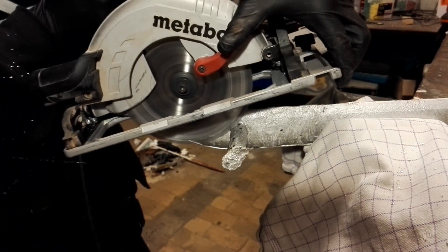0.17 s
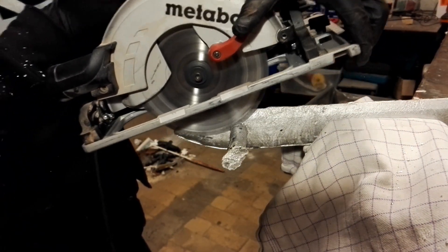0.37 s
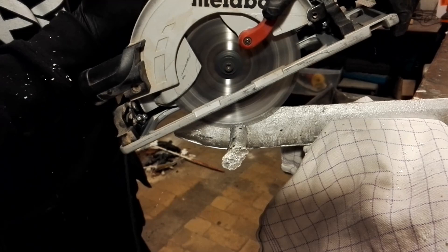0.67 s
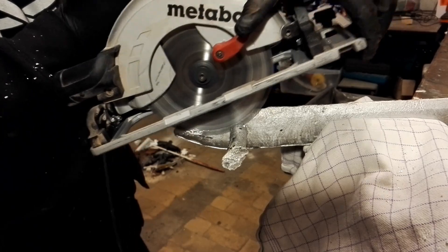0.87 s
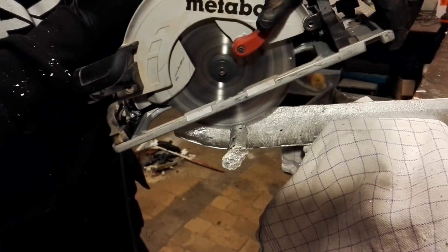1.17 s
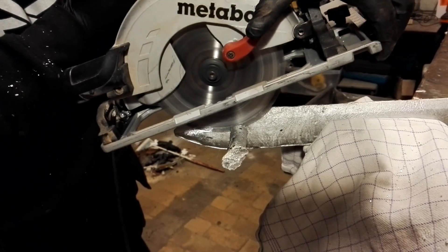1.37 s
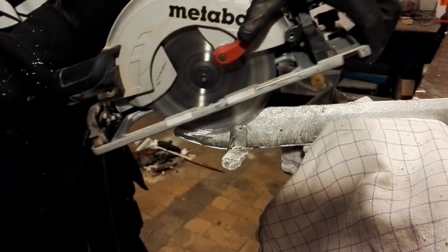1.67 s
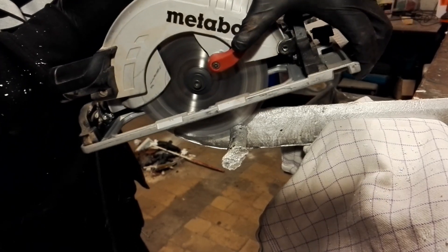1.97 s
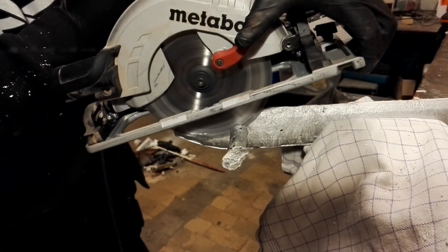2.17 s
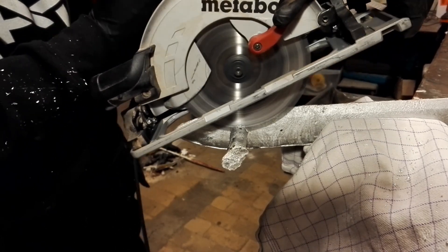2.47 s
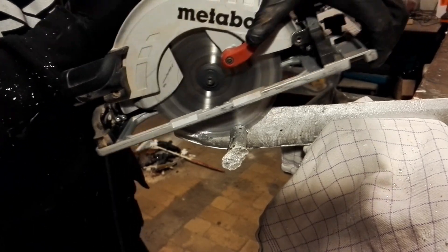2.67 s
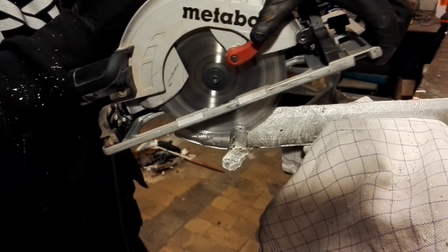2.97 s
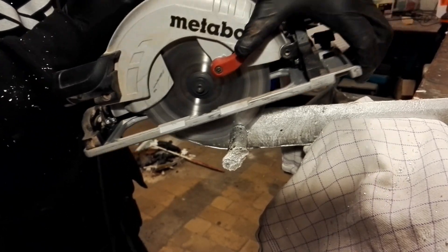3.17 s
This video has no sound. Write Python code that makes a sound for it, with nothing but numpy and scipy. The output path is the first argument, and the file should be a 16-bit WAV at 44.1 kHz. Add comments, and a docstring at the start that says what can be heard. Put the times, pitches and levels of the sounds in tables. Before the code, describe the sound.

A handheld circular saw grinds loudly through a metal bar, with one brief break.

```python
"""In a workshop, a handheld circular saw grinds through a rough metal bar, close to a stereo microphone.
The teeth tear out a dense roar, whine as they strike one after another and break off ticking chips.
The blade and the bar ring. The cut eases briefly a few times; just after one second the blade leaves
the metal and only the free-running motor is left. The microphone is overloaded, which roughens it all."""
import sys
import numpy as np
from scipy import signal
from scipy.fft import rfft, irfft, next_fast_len
from scipy.io import wavfile

SR = 44100
rng = np.random.default_rng(int(sys.argv[2]) if len(sys.argv) > 2 else 0)


def dump_mix(stems):
    """Bounce the given channels to the path in sys.argv[1] as a 16-bit WAV at rate SR."""
    frames = np.atleast_2d(stems).T  # one column per channel
    limited = np.clip(frames, -1, 1)  # hard clip at full scale
    pcm = np.round(limited * 32767).astype(np.int16)
    wavfile.write(sys.argv[1], SR, pcm)


N = 146853   # samples: 3.33 s

# How hard the teeth bite, which sets the loudness of the whole cut: t/s, level/dB
BITE = [(0, -35), (.012, -43), (.03, -44.5), (.045, -44), (.062, -33.5), (.1, -34), (.2, -32.5),
        (.3, -34.5), (.55, -34), (.8, -34.5), (.9, -34), (1.0, -31), (1.096, -34.5), (1.109, -40.5),
        (1.127, -62), (1.163, -68), (1.170, -60), (1.173, -39.5), (1.198, -67), (1.202, -35.5),
        (1.216, -38), (1.224, -36), (1.3, -36), (1.4, -31.5), (1.6, -33), (1.72, -32.5), (1.735, -36),
        (1.76, -35), (1.777, -47), (1.788, -36.5), (1.797, -34.5), (1.87, -31), (1.925, -36), (2.0, -34.5),
        (2.3, -32.5), (2.42, -34), (2.52, -36), (2.75, -33.5), (2.93, -34), (3.02, -32.5), (3.1, -33.5),
        (3.15, -34.5), (3.22, -34), (3.33, -33)]
# The roar's tone, from low to high: f/Hz, relative level/dB
ROAR_SPECTRUM = [(12, -30), (20, -8), (150, -6), (330, -3.5), (700, -3), (1100, -5), (1600, -4),
                 (2100, -5.5), (3000, -3.5), (4000, -5), (5200, -3.5), (7000, -5), (9000, -5.5),
                 (12000, -7), (16000, -7)]
# The roar's two low regions, rumble then growl: centre f/Hz, width/octaves
LOW_REGIONS = [(100, 2.1), (500, 0.54)]
# How those regions swell and sink: t/s, rumble/dB, left growl/dB, right growl/dB
LOW_SWELLS = [(0, 1, -4, -2.5), (.25, -2, 3, 1), (.52, -0.5, 3, 2), (.75, 1.5, 1.5, 0.5),
              (1.0, 1, -0.5, -3), (1.25, 1, 1.5, -1), (1.55, 0.5, -2, -3.5), (2.15, -0.5, 1.5, -0.5),
              (2.5, 1, 1, -0.5), (2.62, 1, 8, -2), (2.75, -2, 1.5, 1), (2.9, 1, -3.5, -1),
              (3.33, 1, -1, -1)]
# The teeth's whine. Its overtone is at twice the tooth rate (the number of strikes a second):
# t/s, overtone f/Hz, left overtone level/dB, right overtone level/dB, left tooth-rate level/dB
TOOTH_WHINE = [(0, 4860, -9, 2, -21), (.1, 4720, -9, -3.5, -21), (.25, 4690, -9, -3, -18),
               (.4, 4760, -14, -3.5, -24), (.51, 4800, -18, -7.5, -10), (.58, 4770, -26, -26, -16),
               (.8, 4825, -25, -14, -23), (.95, 4760, -28, -22, -18), (1.09, 4873, -20, -13, -17),
               (1.21, 4585, -12, -6.5, -15), (1.3, 4630, -16, -6.5, -11), (1.42, 4830, -23, -18, -19),
               (1.55, 4890, -15, -20, -25), (1.74, 4876, -19, -9, -21), (1.85, 4826, -18, -9.5, -16),
               (2.05, 4740, -26, -7, -13.5), (2.26, 4840, -22, -9, -19), (2.36, 4870, -27, -20, -14),
               (2.5, 4903, -25, -10, -14.5), (2.72, 4930, -22, -9, -18), (2.8, 4846, -18, -14, -24),
               (3.05, 4913, -19, -16, -17), (3.17, 4990, -19, -10, -14), (3.33, 5010, -26, -22, -22)]
# How far the overtone's left wave runs ahead of its right as the saw tilts: t/s, lead/radians
WHINE_LEFT_LEAD = [(0, 2.8), (.5, 3.1), (1.2, 1.4), (1.5, .6), (1.9, -1.6), (2.6, -2.4), (3.1, -1.5)]
# The blade's broad screech: t/s, centre f/Hz, right level/dB
BLADE_SCREECH = [(0.08, 5600, -19), (0.25, 5600, -19), (0.52, 5630, -14), (0.65, 5550, -8),
                 (0.95, 5610, -10.5), (1.22, 5555, -11), (1.32, 5480.0, -15), (1.45, 5706, -12),
                 (1.9, 5650, -14), (2.05, 5650, -13), (2.2, 5640, -14), (2.35, 5560, -10.5),
                 (2.5, 5424, -7.5), (2.62, 5450, -11), (2.75, 5590, -16), (2.9, 5620, -10),
                 (3.05, 5600, -9.5), (3.18, 5450, -7.5), (3.33, 5605, -15)]
# The bar's rasping ring: t/s, centre f/Hz, left level/dB, right level/dB
BAR_RASP = [(0.08, 1689, -12, -10.5), (0.25, 1710, -17, -17), (0.4, 1614, -11.5, -13),
            (0.52, 1650, -21, -20), (0.65, 1620.0, -11.5, -11), (0.8, 1566, -17, -11.5),
            (0.95, 1453, -18, -16), (1.08, 1370.0, -19, -28), (1.22, 1550.0, -11, -13),
            (1.32, 1800.0, -9.5, -9.5), (1.45, 1500.0, -15.5, -29), (1.6, 1375, -18, -15),
            (1.9, 1690.0, -25, -20), (2.05, 1725, -35, -15.5), (2.35, 1440, -11.5, -18),
            (2.5, 1676, -17, -12), (2.66, 1550, -19, -14), (2.76, 1470, -7.5, -14), (2.9, 1455, -16, -14),
            (3.03, 1451, -9, -21), (3.2, 1400, -12.5, -23)]
# Blade notes that each swell once:
# f/Hz, width/Hz, relative level/dB, peak t/s, time spread/s, left minus right/dB
BLADE_NOTES = [(414, 64, -25, 2.55, 0.11, 4), (2885, 550, -12, 0.3, 0.33, 8),
               (6810, 180, -10, 2.1, 0.28, 5), (8600, 270, -9, 0.762, .13, -6),
               (8580, 300, -11, 2.65, .12, -7), (10570, 650, -9.5, 0.27, 0.2, -7),
               (11760, 390, -10, 2.295, 0.2, -7), (14300, 400, -7, .2, .25, 6),
               (14250, 300, -7, 2.4, .07, -4), (14300, 350, -9, 3.1, 0.079, -5)]
# Peaks and dips that the guard around the blade puts in the treble: f/Hz, gain/dB
GUARD_PEAKS = [(6300, 0), (7200, 1), (8150, -1.5), (8700, .5), (9300, -1), (10400, .5), (11200, -2),
               (11600, 0.5), (12050, 1), (12500, -4.5), (13000, 2), (13450, -1.5), (14250, 0.5),
               (15050, -2), (15600, 1.5)]
# The tone of the rushing motor and fan: f/Hz, relative level/dB
MOTOR_SPECTRUM = [(24, -24), (40, 3), (150, -3), (400, -2), (1300, -5.5), (2200, -3), (4000, 0), (9000, -2),
                  (12000, -1.5), (16000, -6)]
# Thin whistles of the motor's brushes: f/Hz, level/dB
BRUSH_WHISTLES = [(11070, -72), (14150, -69)]
# Which side the roar and the motor's rush lean to: f/Hz, left minus right/dB
STEREO_BALANCE = [(25, -2), (110, 0.8), (250, 1), (700, 0.5), (1290, 0), (2380, 1.5), (4400, -0.5),
                  (8120, -2), (15000, -2.5)]
# How alike their two sides are: f/Hz, likeness (0 is unrelated, 1 is the same)
STEREO_LIKENESS = [(60, .05), (250, -0.091), (1000, -.03), (4000, -0.014), (8000, 0.064), (13000, 0.069)]


def roar(level_db=-0.58, flutter_db=1.16, patchy_db=.6):
    """Teeth tearing metal make a broad, flickering noise whose low notes swell and sink."""
    rumble_db, *growl_db = over_time(LOW_SWELLS)
    flutter = flutter_db * drift(16)[0]   # moves all bands and both sides together

    def band_change_db(hz):
        rumble, growl = [bell(np.log2(hz / centre), width) for centre, width in LOW_REGIONS]
        return rumble * rumble_db + growl * np.array(growl_db) + flutter + patchy_db * drift(6.8)
    return from_db(level_db) * shaped_noise(ROAR_SPECTRUM, band_change_db)


def tooth_whine(width_hz=180, third_db=-17, right_db=-7):
    """Tooth strikes make ragged tones at 1, 2 and 3 times the tooth rate, which sags under load."""
    overtone_hz, *overtone_db, tooth_db = over_time(TOOTH_WHINE)
    lead, = over_time(WHINE_LEFT_LEAD)
    tooth_hz = overtone_hz / 2
    second = ragged_tone(overtone_hz, width_hz, shared=.8, lead=lead)
    third = from_db(third_db) * ragged_tone(3 * tooth_hz, width_hz)
    first = from_db([tooth_db, tooth_db + right_db]) * ragged_tone(tooth_hz, width_hz)
    return first + from_db(overtone_db) * (second + third)


def blade_screech(left_db=-17):
    """The blade screeches, mostly on the right; the pitch wanders as it works deeper."""
    hz, db = over_time(BLADE_SCREECH)
    return from_db([db + left_db, db]) * tone_pair(hz, split_hz=220, width_hz=280)


def bar_rasp():
    """The bar rings with a rasp whose pitch wanders as the cut deepens."""
    hz, left_db, right_db = over_time(BAR_RASP)
    return from_db([left_db, right_db]) * tone_pair(hz, split_hz=150, width_hz=200)


def blade_shimmer(level_db=-10, swing_db=5, width_hz=200):
    """The blade vibrates in many small ways, each ringing up and dying away by chance."""
    pitches_hz = 2500 * 6 ** rng.random(30)   # 2500 to 15000 Hz
    rings = sum(from_db(swing_db * drift(2.9)) * ragged_tone(hz, width_hz) for hz in pitches_hz)
    return from_db(level_db) * unit_level(rings)


def blade_swells(resting_db=-18, swell_db=9, waver_db=1.5):
    """Each of the blade's own notes swells as the cut passes the depth that suits it."""
    t = np.arange(N) / SR
    notes = 0
    for hz, width_hz, db, peak_s, spread_s, balance_db in BLADE_NOTES:
        level_db = db + resting_db + swell_db * bell(t - peak_s, spread_s) + waver_db * drift(2.2)
        notes += from_db(level_db) * pan(balance_db) * ragged_tone(hz, width_hz)
    return notes


def chips(per_second=900, level_db=-20.5):
    """Chips of metal break off with tiny, sharp ticks."""
    breaks = rng.random((2, N)) < per_second / SR
    strength_db = 1.3 * np.minimum(rng.exponential(1, (2, N)), 4)
    ticks = cut_lows(breaks * from_db(strength_db), hz=600)
    return from_db(level_db) * unit_level(ticks)


def blade_guard(sound):
    """The guard around the blade lifts some high pitches and weakens others."""
    size = next_fast_len(N)
    hz = np.arange(1, size // 2 + 2) * SR / size
    return irfft(rfft(sound, size) * from_db(at_hz(GUARD_PEAKS, hz)), size)[:, :N]


def motor(rush_db=-49.5):
    """The motor and its fan rush steadily while the brushes whistle faintly."""
    rush = from_db(rush_db) * shaped_noise(MOTOR_SPECTRUM, lambda hz: 0)
    return rush + sum(from_db(db) * ragged_tone(hz, width_hz=40) for hz, db in BRUSH_WHISTLES)


def shaped_noise(spectrum, band_change_db):
    """Stereo noise built from bands a third of an octave wide, each with its own level."""
    edges_hz = 20 * 2 ** np.arange(0, 10, 1 / 3)
    white = rng.standard_normal((2, 2, N + 4000))   # extra samples let the filters settle
    noise = 0
    for k, (low, high) in enumerate(zip(edges_hz, edges_hz[1:])):
        band_filter = signal.butter(2, [low, high], "band", fs=SR, output="sos")
        band = signal.sosfilt(band_filter, white[k % 2])[:, -N:]
        hz = np.sqrt(low * high)
        band = band + at_hz(STEREO_LIKENESS, hz) / 2 * band[::-1]   # mix in a little of the other side
        gain = from_db(at_hz(spectrum, hz) + band_change_db(hz))
        noise += gain * pan(at_hz(STEREO_BALANCE, hz)) * band
    return unit_level(noise)


def ragged_tone(hz, width_hz, shared=.3, lead=None):
    """Noise gathered around one pitch; `shared` is the part that both sides have in common."""
    decay = np.exp(-np.pi * width_hz / SR)
    a, b = [np.sqrt(1 - shared) * noise[:2] + np.sqrt(shared) * noise[2]
            for noise in smooth(rng.standard_normal((2, 3, N)), decay)]
    if lead is None:
        lead = 2 * np.pi * rng.random()
    right_phase = 2 * np.pi * np.cumsum(np.broadcast_to(hz, N)) / SR
    phase = np.array([right_phase + lead, right_phase])
    return unit_level(a * np.cos(phase) + b * np.sin(phase))


def tone_pair(hz, split_hz, width_hz, waver_db=1.2):
    """Two ragged tones, one either side of a pitch, each wavering in loudness."""
    return unit_level(sum(from_db(waver_db * drift(4.0)) * ragged_tone(hz + offset, width_hz)
                          for offset in (-split_hz, split_hz)))


def drift(rate_hz):
    """A slow random wobble of typical size 1, one for each side."""
    step = 40   # samples between random points
    decay = np.exp(-2 * np.pi * rate_hz * step / SR)
    slow = smooth(rng.standard_normal((2, N // step + 2002)), decay)[:, 2000:]
    return np.array([np.interp(np.arange(N) / step, np.arange(len(v)), unit_level(v)) for v in slow])


def smooth(x, decay):
    """Smooth twice over; the nearer decay is to 1, the slower the result moves."""
    return signal.lfilter([1], [1, -2 * decay, decay * decay], x)


def cut_lows(x, hz):
    """Gently weaken everything below a pitch."""
    return signal.sosfilt(signal.butter(1, hz, "high", fs=SR, output="sos"), x)


def over_time(table):
    """Turn each column after the time into a curve with one value per sample."""
    times, *columns = np.transpose(table)
    return [np.interp(np.arange(N) / SR, times, column) for column in columns]


def at_hz(table, hz):
    """Look up a table's value at a pitch."""
    pitches, values = np.transpose(table)
    return np.interp(np.log(hz), np.log(pitches), values)


def bell(distance, spread):
    """A smooth hump, 1 high at its middle."""
    return np.exp(-.5 * (distance / spread) ** 2)


def pan(balance_db):
    """Left and right gains that differ by balance_db."""
    return from_db(np.array([[.5], [-.5]]) * balance_db)


def from_db(db):
    """Turn decibels into a number to multiply by."""
    return 10 ** (np.asarray(db) / 20)


def unit_level(x):
    """Scale to an average (rms) level of 1."""
    return x / np.sqrt(np.mean(x ** 2) + 1e-20)


def scene():
    """All the cutting sounds follow the bite of the teeth; the motor runs on underneath."""
    bite_db, = over_time(BITE)
    grinding = blade_guard(roar() + blade_shimmer())
    cut = grinding + tooth_whine() + blade_screech() + bar_rasp() + blade_swells() + chips()
    return from_db(bite_db) * cut + motor()


def record(dry, ceiling=.13, lopsided=1.8, top_hz=15720):
    """The overloaded microphone rounds off peaks unevenly; the deepest lows and top highs are cut."""
    rounded = ceiling * np.tanh((dry + lopsided * dry ** 2) / ceiling)
    top_filter = signal.ellip(14, .3, 90, top_hz, fs=SR, output="sos")
    return signal.sosfilt(top_filter, cut_lows(rounded, hz=15))


dry = scene()
out = record(dry)
dump_mix(out)
```